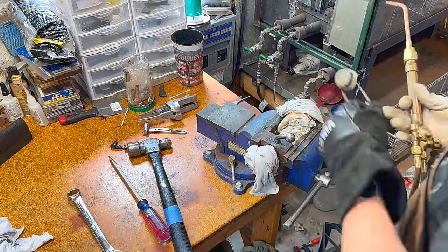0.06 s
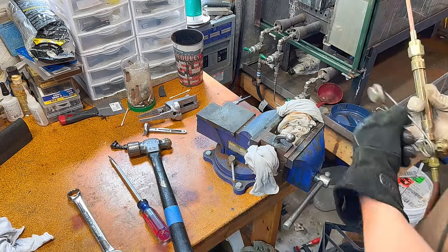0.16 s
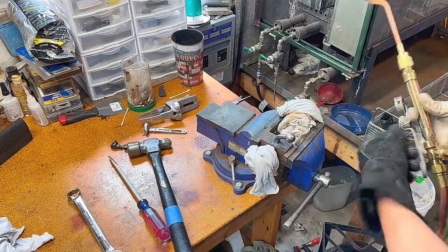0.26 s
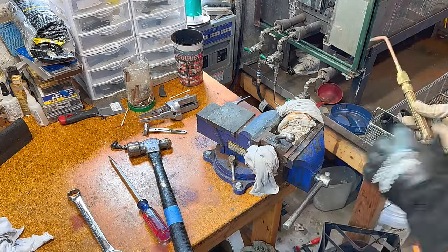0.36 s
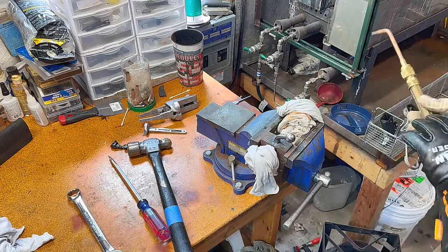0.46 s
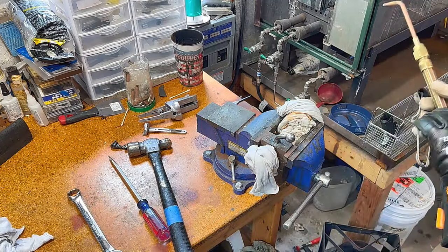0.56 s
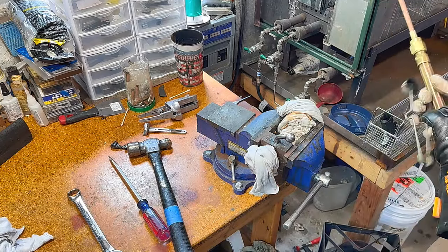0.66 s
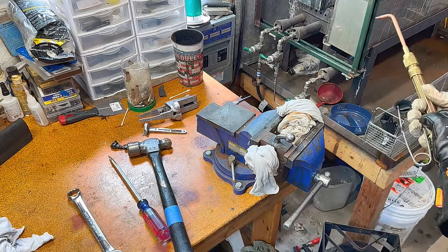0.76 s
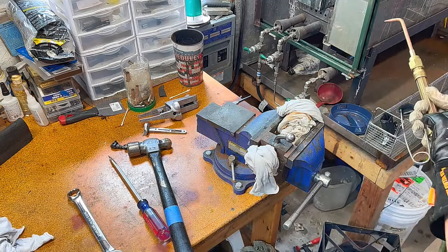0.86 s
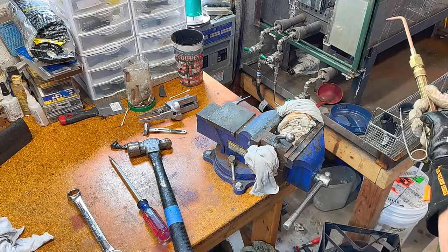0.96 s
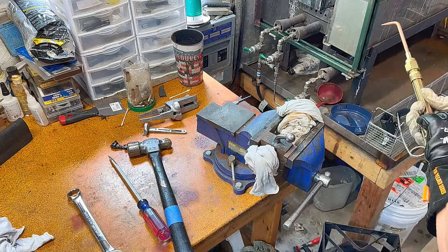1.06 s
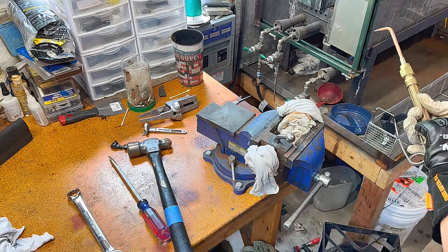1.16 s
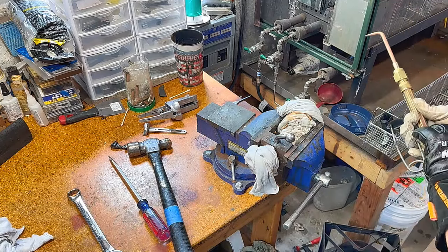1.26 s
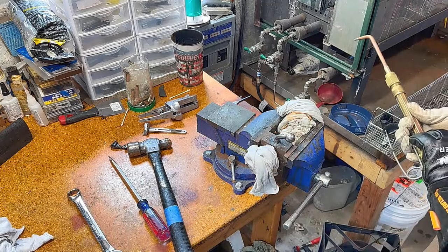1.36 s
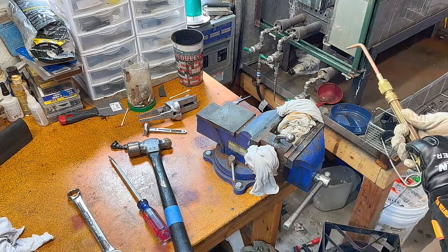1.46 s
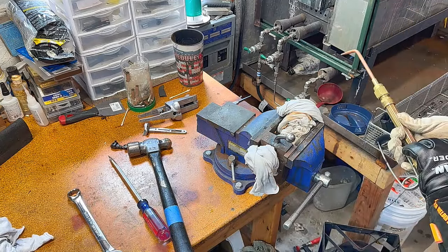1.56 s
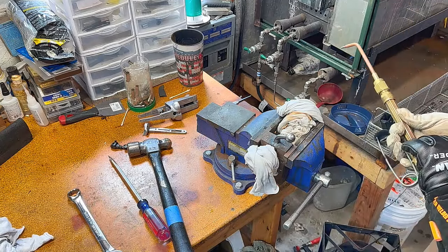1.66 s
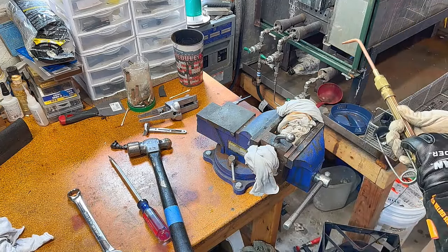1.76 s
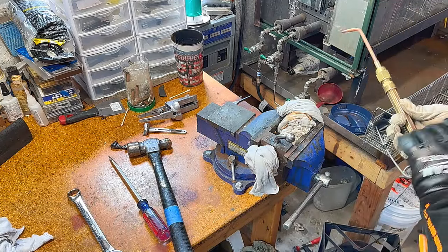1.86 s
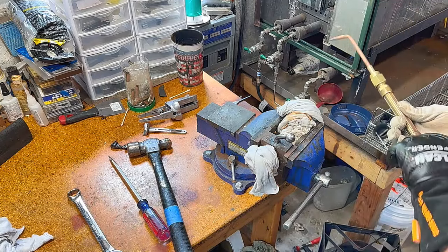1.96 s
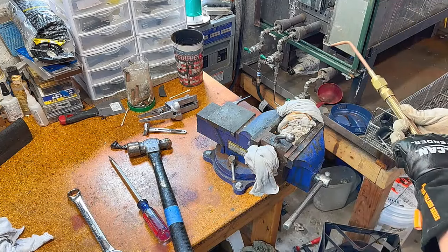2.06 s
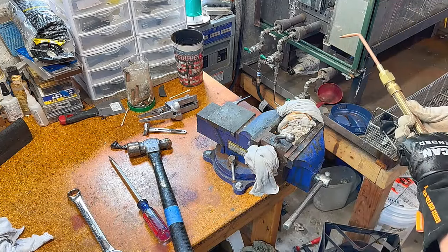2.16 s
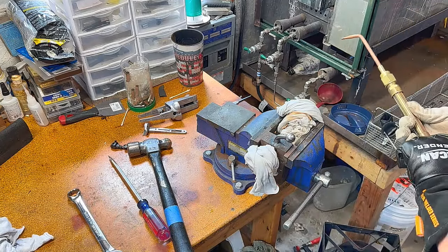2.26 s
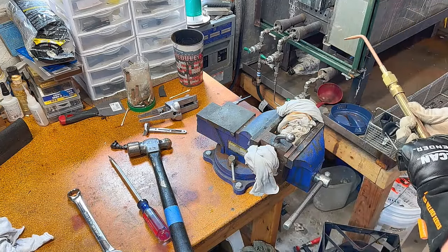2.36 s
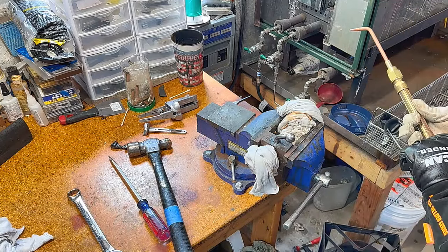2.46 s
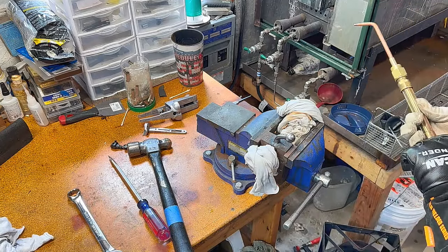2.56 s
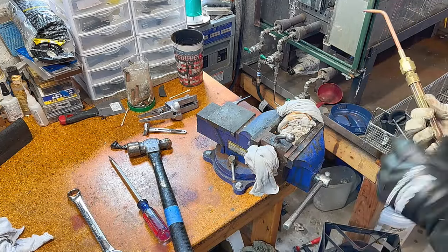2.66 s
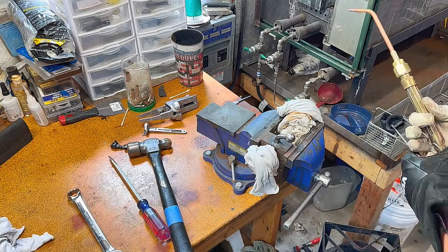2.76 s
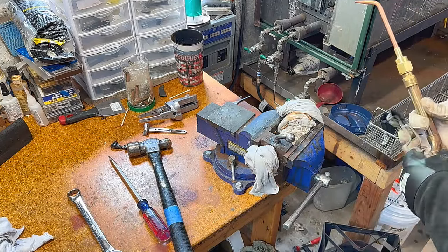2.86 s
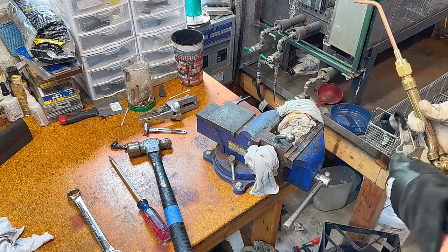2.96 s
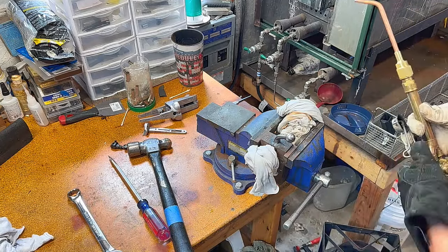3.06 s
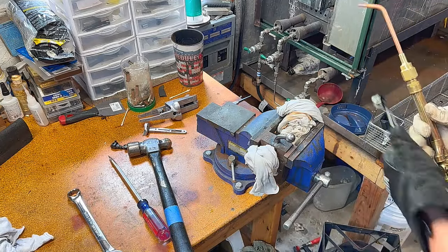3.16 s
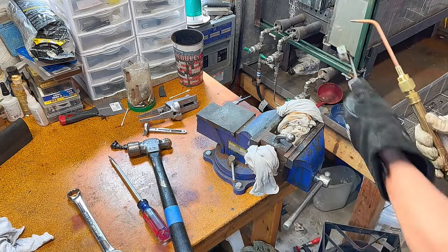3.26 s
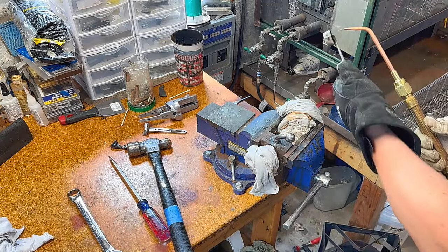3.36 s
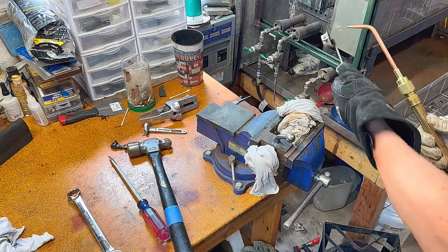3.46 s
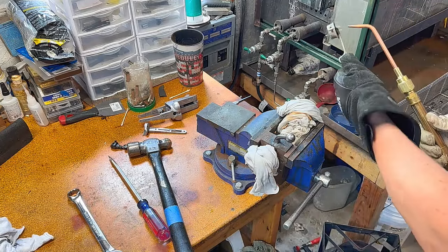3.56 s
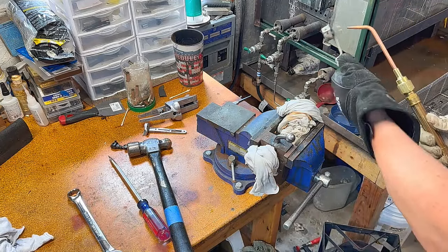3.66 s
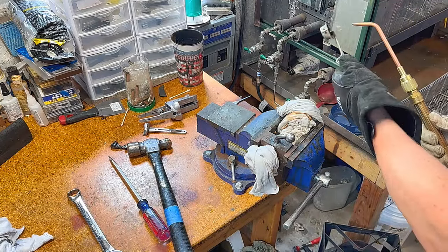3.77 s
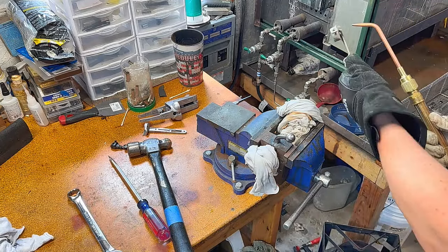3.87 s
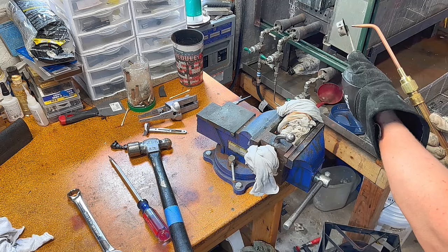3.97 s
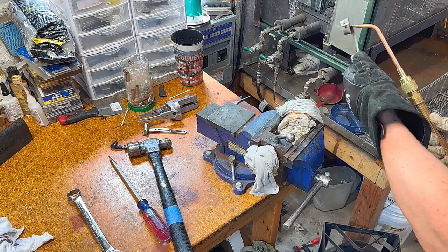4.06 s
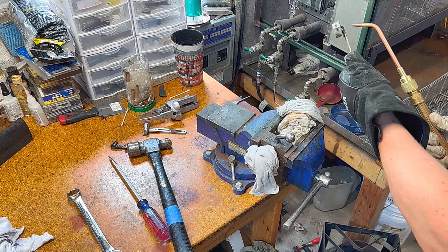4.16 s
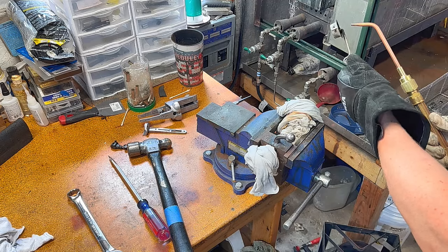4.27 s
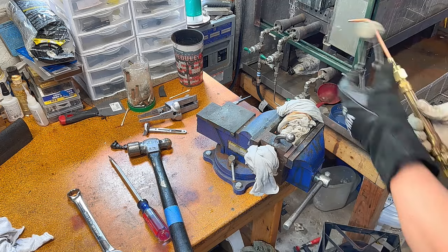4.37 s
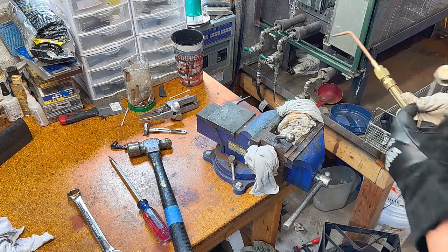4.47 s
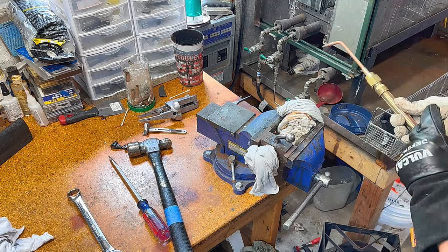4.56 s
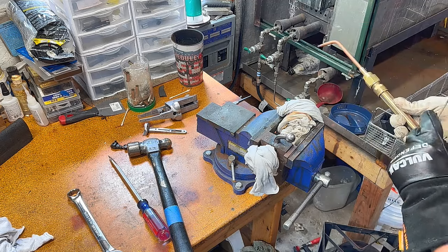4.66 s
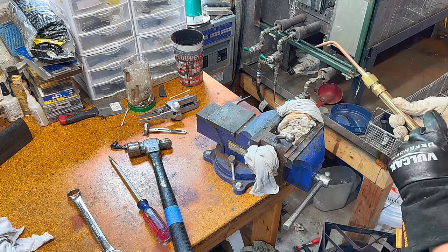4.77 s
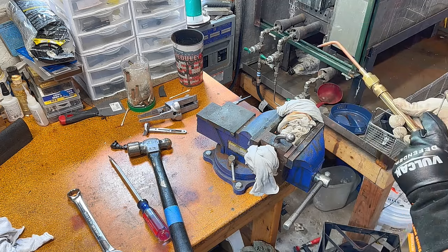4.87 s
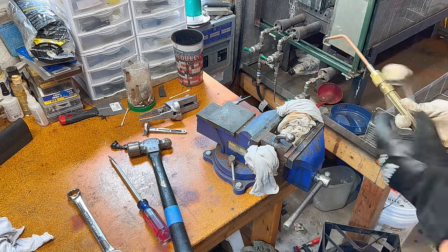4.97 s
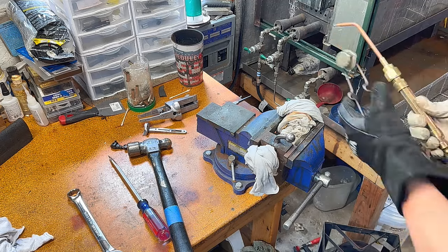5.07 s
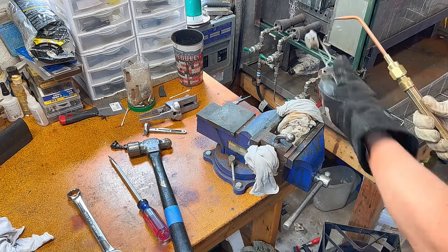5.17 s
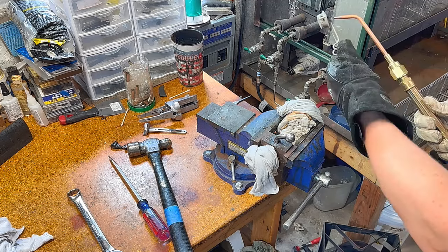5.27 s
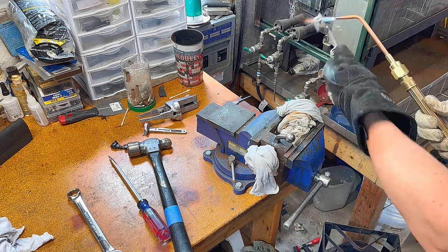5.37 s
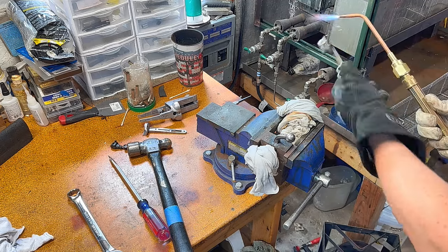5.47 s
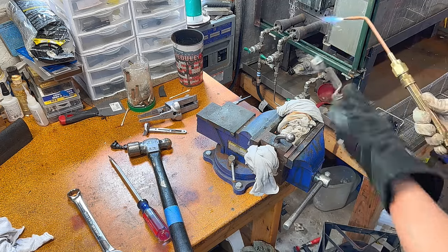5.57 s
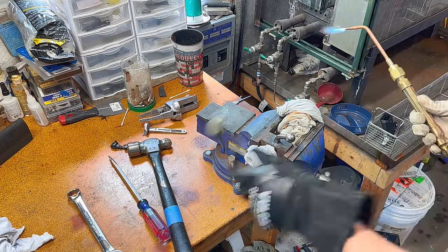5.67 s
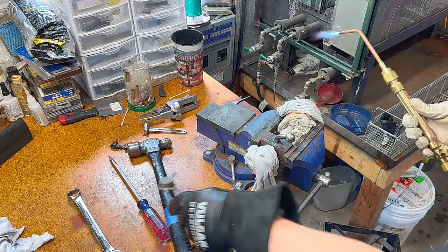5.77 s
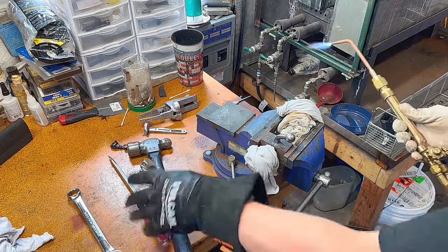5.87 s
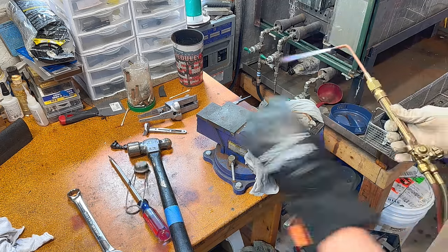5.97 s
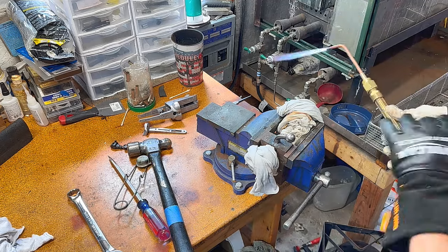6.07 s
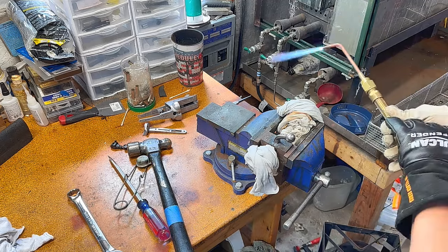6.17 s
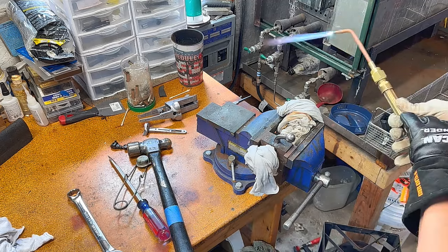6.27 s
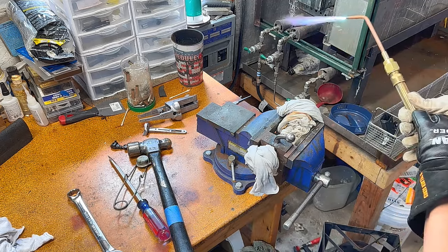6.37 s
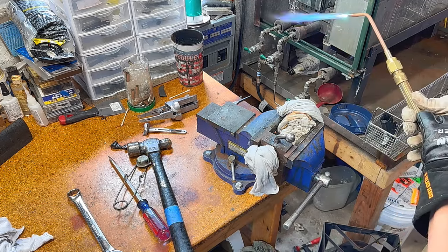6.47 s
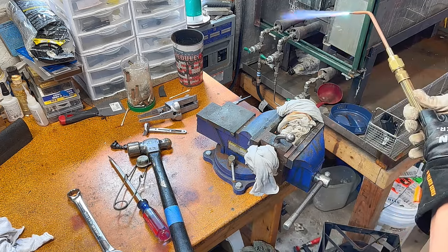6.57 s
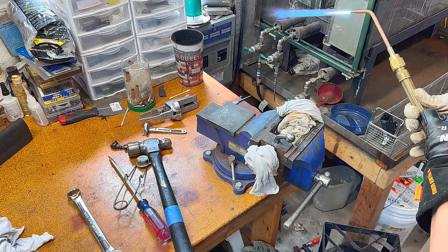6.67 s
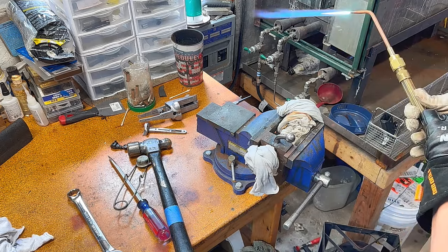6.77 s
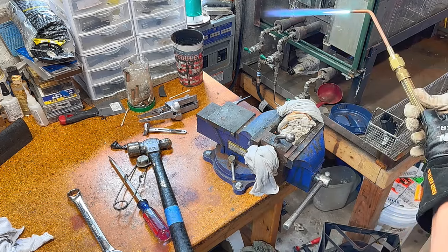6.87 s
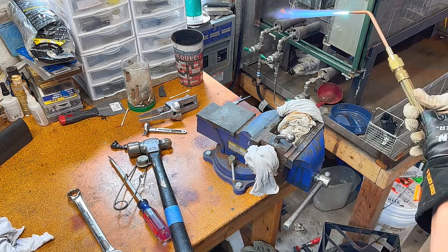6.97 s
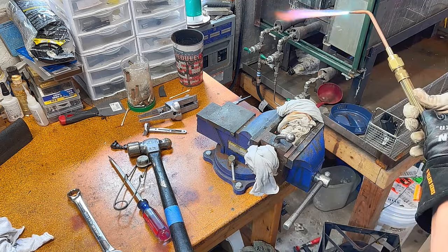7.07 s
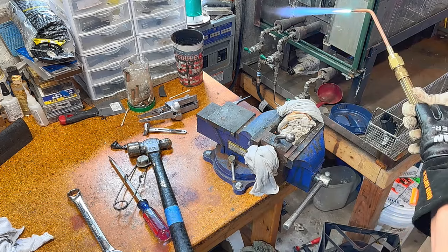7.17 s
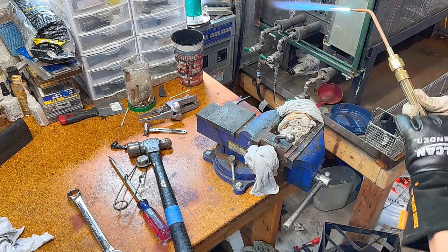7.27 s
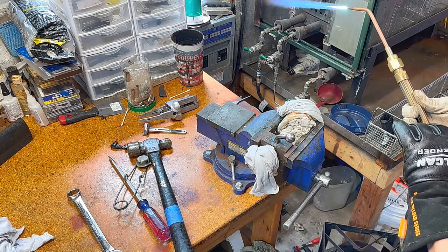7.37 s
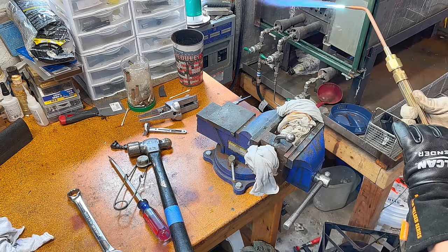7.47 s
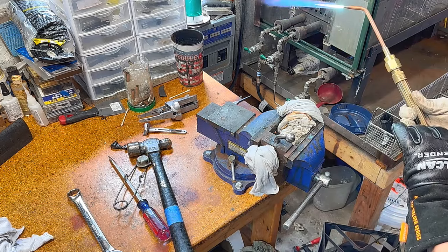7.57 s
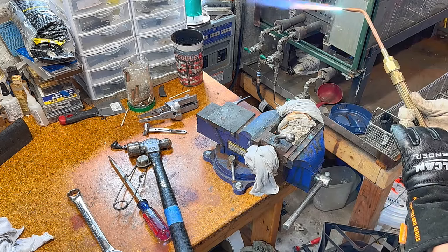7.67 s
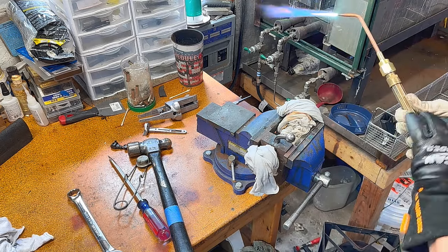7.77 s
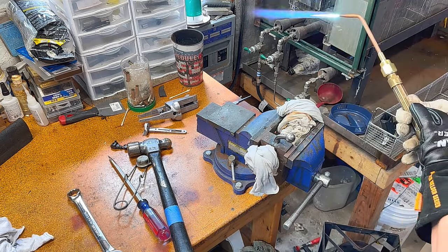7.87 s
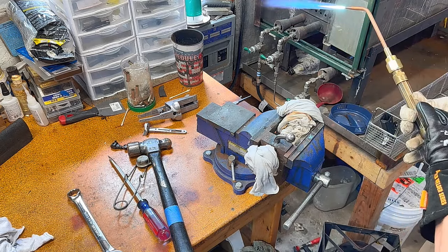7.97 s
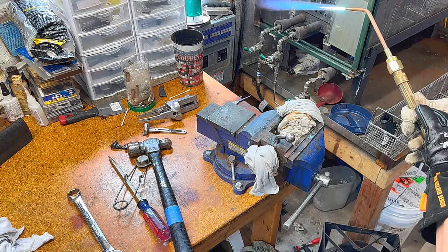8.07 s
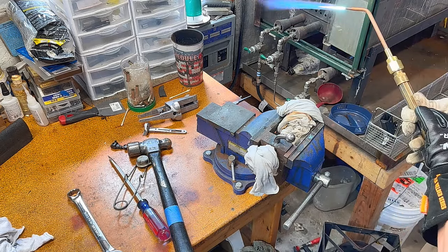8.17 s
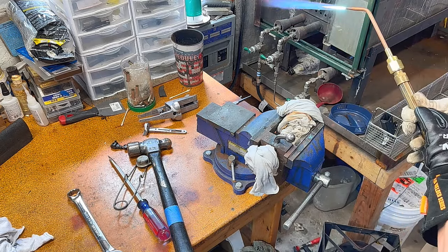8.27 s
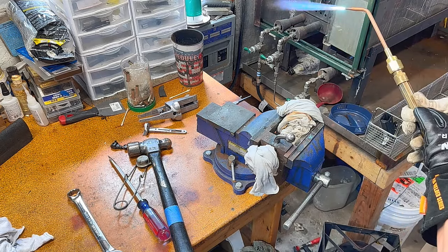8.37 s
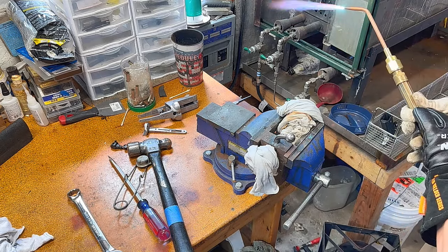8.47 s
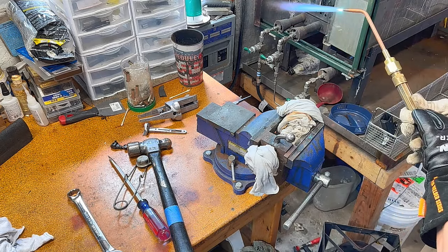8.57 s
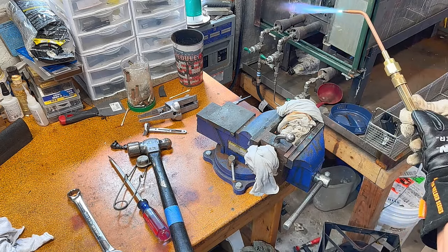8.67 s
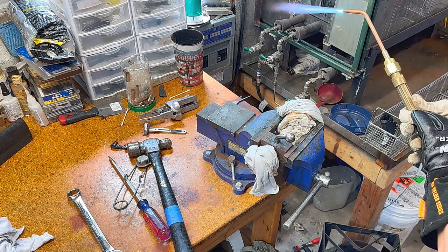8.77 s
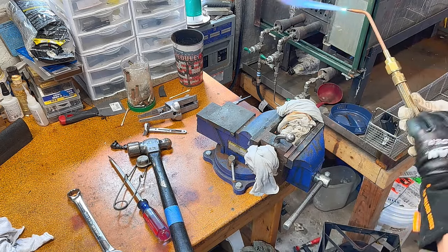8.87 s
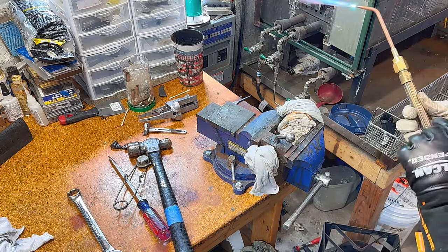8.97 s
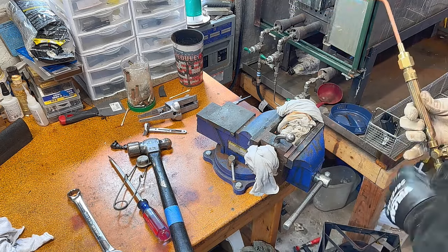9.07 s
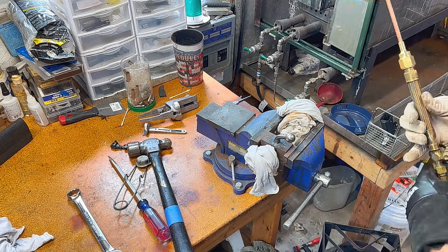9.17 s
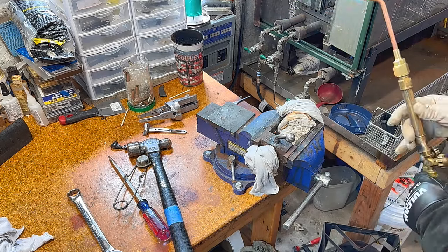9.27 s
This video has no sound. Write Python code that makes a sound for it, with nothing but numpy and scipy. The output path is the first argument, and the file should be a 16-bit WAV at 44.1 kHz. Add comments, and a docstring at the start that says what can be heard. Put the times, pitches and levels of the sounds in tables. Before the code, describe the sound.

A flint striker rasps and rings over a low motor hum, then a gas torch pops alight, hisses hard, and settles into growing flame noise.

```python
"""In a workshop a motor hums while a gas torch is lit over a workbench, heard close by a microphone pair.
Gas leaks from the tip as filtered noise with thin whistles; a flint striker rasps as clicks ringing in metal.
The gas catches with a pop and burns lifted off the tip, as loud hissing noise, then snaps back onto it.
The striker clatters onto the bench; the flame, noise in bands from roar to sizzle, grows as the valves are opened."""
import sys
import numpy as np
from scipy import signal
from scipy.fft import rfft, irfft, next_fast_len
from scipy.io import wavfile
from scipy.ndimage import map_coordinates

SR = 44100
rng = np.random.default_rng(int(sys.argv[2]) if len(sys.argv) > 2 else 0)


def put_to_file(sound):
    """Save the sound as 16-bit audio at rate SR, in the file named by the first command-line argument."""
    columns = np.atleast_2d(sound).T  # one column per channel
    safe = np.clip(columns, -1, 1)
    whole_steps = np.round(safe * 32767)
    wavfile.write(sys.argv[1], SR, whole_steps.astype(np.int16))


N = 411012
TIME = np.arange(N) / SR
SEATED_S = 5.89   # the flame sits on the tip from here on

# Coil spring of the striker. Each row: pitch in Hz, width in Hz, relative level in dB.
SPRING_MODES = [(8330, 170, -5), (8700, 120, 6.5), (8990, 140, 7), (9600, 430, -12.5), (12340, 500, -8),
                (14300, 790, -11)]
# Bands and hollows that the nozzle gives to the hiss of the burning flame.
# Each row: frequency in Hz, relative gain in dB.
NOZZLE_BANDS = [(1450, 1.5), (1750, -5), (2020, 1.5), (2480, -5.5), (2850, 1), (3400, 1), (3880, -3.5),
                (4200, 0), (4580, 1.8), (5350, -4.5), (5750, 0.5), (6150, -1.5), (7170, 1), (7650, -2),
                (8400, 2.5), (9050, -3), (9450, 2.5), (10000, -2.5), (13000, 0.5), (14300, 3), (15500, 0.5)]


def from_db(db):
    """Level in dB to amplitude."""
    return 10 ** (np.asarray(db) / 20)


def rms_one(x):
    """Scale to an rms of 1."""
    return x / np.sqrt(np.mean(x ** 2) + 1e-20)


def in_time(rows):
    """Each column of a curve at every sample."""
    s, *columns = np.transpose(rows)
    return [np.interp(TIME, s, c) for c in columns]


def at_bins(points):
    """A table over log frequency, read at every bin."""
    hz, value = np.transpose(points)
    bins_hz = np.fft.rfftfreq(next_fast_len(N), 1 / SR)
    return np.interp(np.log(bins_hz + 1), np.log(hz), value)


def weigh(x, gains):
    """Give each frequency its gain."""
    spectrum = rfft(x, next_fast_len(N))
    return irfft(spectrum * gains, next_fast_len(N))[..., :N]


def colour(x, points):
    """Shape by a spectrum; white noise keeps its power."""
    return weigh(x, rms_one(from_db(at_bins(points))))


def resonate(x, modes):
    """Parallel resonances; white noise keeps its power."""
    out, power = 0, 0
    for hz, width, db in modes:
        r = np.exp(-np.pi * width / SR)
        zeros = np.array([1, 0, -1]) * (1 - r * r) / 2
        poles = [1, -2 * r * np.cos(2 * np.pi * hz / SR), r * r]
        out = out + from_db(db) * signal.lfilter(zeros, poles, x + 1e-18)
        power += from_db(db) ** 2 * (1 - r)
    return out / np.sqrt(power)


def white():
    """Unrelated noise for the sum and the difference of the two sides."""
    return rng.standard_normal((2, N))


def drift(rate):
    """Slow chance with rms 1, from two random knots per cycle of the rate in Hz."""
    knots = np.arange(0, TIME[-1] + 1, .5 / rate)
    heights = rng.standard_normal(N // 20)[:len(knots)]
    return rms_one(np.interp(TIME, knots, heights))


def grains(per_s, spread_db):
    """Random clicks of uneven size; rms 1."""
    struck = rng.random(N) < per_s / SR
    size = from_db(spread_db * rng.uniform(-2, 2, N))
    return rms_one(struck * np.sign(white()) * size)


def swells(rows, rise_s, fall_s):
    """One envelope per level column: each event swells, holds for its length and dies."""
    out = np.zeros((len(rows[0]) - 2, N))
    for s, length, *levels in rows:
        near = slice(int((s - .1) * SR), int((s + .3) * SR))   # empty for an event before 0.1 s
        t = TIME[near] - s
        shape = np.exp(np.minimum(t, 0) / rise_s - np.maximum(t - length, 0) / fall_s)
        out[:, near] += from_db(levels)[:, None] * shape
    return out


def workshop(x, wet_db, near_t60, far_t60, far_db):
    """Dense echoes from the cluttered bench, then a faint tail; long waves pass the clutter by."""
    t = TIME[:SR // 5]
    turn = 2 * np.pi * 1.8 * TIME   # the echo pattern turns 1.8 times a second, as the hands move
    fading = from_db(-60 * t / near_t60) + from_db(far_db - 60 * t / far_t60)
    clutter = signal.butter(2, 1100, "high", fs=SR, output="sos")
    wet = 0
    for share in (np.cos(turn), np.sin(turn)):
        echoes = signal.sosfilt(clutter, rng.standard_normal((2, len(t))) * fading)
        echoes /= np.linalg.norm(echoes, axis=1, keepdims=True)
        wet = wet + signal.oaconvolve(x * share, echoes, axes=1)[:, :N]
    return (x + from_db(wet_db) * wet) / np.hypot(1, from_db(wet_db))


def motor():
    """A deep, almost pure hum that beats slowly and wanders a little in level."""
    hum_hz, hum_db, wander_db = 58.35, -36.5, 1.5
    beat_hz, beat_crest_s, beat_db = 2.48, .037, 1   # beat_db swings to either side
    # The hum sinks for a while: middle in seconds, half length in seconds, depth in dB.
    hum_sink = (6.33, 0.62, 3.3)
    middle_s, half_s, depth_db = hum_sink
    beat = np.cos(2 * np.pi * beat_hz * (TIME - beat_crest_s))
    sink_db = depth_db * np.exp(-((TIME - middle_s) / half_s) ** 2)
    level_db = hum_db + beat_db * beat - sink_db + wander_db * drift(rate=2.0)
    return from_db(level_db) * np.sqrt(2) * np.sin(2 * np.pi * hum_hz * TIME)


def workshop_air():
    """Broad noise of the room air, and noise in narrow resonances that drones at a few pitches."""
    # Room air. Each row: frequency in Hz, relative density in dB per Hz.
    air_colour = [(25, -5.5), (50, -2), (90, 4), (140, -12), (200, -15), (300, -10), (480, -16.5),
                  (700, -19.5), (1400, -26.5), (2500, -36.5), (5000, -52), (16000, -47.5)]
    # Drone of the workshop. Each row: pitch in Hz, width in Hz, relative level in dB.
    drone_modes = [(234.5, 15, 0), (414.7, 15.7, -9.5), (775, 16, -18), (1044, 20, -17.5),
                   (1442, 33, -19.5), (1583, 26, -25.5), (1970, 81, -30)]
    air = from_db(-56.5) * colour(white(), air_colour)
    drone = from_db(-59.5) * resonate(white(), drone_modes)
    return air + drone


def unlit_gas():
    """Escaping gas hisses faintly in the bore of the tip, with wavering whistles and one low whoop."""
    # Hiss before and after the striking. Each row: time in seconds, relative level in dB.
    leak_curve = [
        [(0.0, -66), (1.13, -78.5), (2.54, -71), (2.68, -68), (3.3, -69.5)],
        [(4.4, -69.5), (4.808, -75), (4.91, -68.5), (5.05, -68.5), (5.27, -66)],
    ]
    # Each row: frequency in Hz, relative density in dB per Hz.
    leak_colour = [(500, 10), (2500, 1), (4200, -4.5), (5500, -2.5), (7000, -2.5), (8300, -3), (10500, -16),
                   (13000, -16), (15000, -6), (16000, -12.5)]
    # The bore sings faintly. Each row: pitch in Hz, width in Hz, relative level in dB.
    bore_modes = [(4180, 170, -1.5), (7030, 356, -1), (8230, 200, 1.5)]
    # Gas and valves whistle thinly. Each row: start and end in seconds, starting pitch in Hz,
    # glide in octaves per second, level in dB, flicker in dB.
    whistles = [(1.42, 1.95, 531, 0, -69, 3), (1.9, 4.75, 533, 0, -65.5, 3),
                (2.47, 2.69, 925, .2, -62.5, .5), (2.63, 2.74, 950, .6, -71, 1),
                (.17, .36, 640, 1.6, -68, 2), (1.42, 2.2, 4230, 0, -84, 3), (3.2, 5.25, 4230, 0, -84, 3),
                (4.96, 5.19, 4030, 0, -73, 1), (5.0, 5.25, 4430, 0, -80, 2)]
    # Each row: middle and width in seconds, pitch at the middle in Hz, glide in octaves per second, level in dB.
    whoops = [(4.765, .016, 172, -14, -31)]
    leak_db, = in_time(np.vstack(leak_curve))
    hiss = colour(white(), leak_colour) + from_db(-9) * resonate(white(), bore_modes)
    out = from_db(leak_db + 3) * hiss * (TIME < SEATED_S)
    waver, flicker = drift(rate=15), drift(rate=4.5)
    for start, end, hz, glide, db, flicker_db in whistles:
        pitch = hz * 2 ** (glide * np.clip(TIME - start, 0, end - start))
        gate = np.clip(np.minimum(TIME - start, end - TIME) / 0.014, 0, 1)
        phase = 2 * np.pi * np.cumsum(pitch * (1 + 0.00288 * waver)) / SR
        out[0] += from_db(db + flicker_db * flicker) * gate * np.sin(phase)
    for s, width, hz, glide, db in whoops:
        pitch = hz * 2 ** np.clip(glide * (TIME - s), -1, 1)
        swell = np.exp(-((TIME - s) / width) ** 2)
        out[0] += from_db(db) * swell * np.sin(2 * np.pi * np.cumsum(pitch) / SR)
    return out


def arm_squeal(drive):
    """The wire arm rings on one wavering note while driven, then dies away."""
    arm_hz, waver, t60_s = 7120, 0.0064, 0.054
    keep = from_db(-60 / (t60_s * SR)) ** 2
    level = np.sqrt(signal.lfilter([1 - keep], [1, -keep], drive ** 2 + 1e-18))
    phase = 2 * np.pi * np.cumsum(arm_hz * (1 + waver * drift(rate=120))) / SR
    return np.sqrt(2) * level * np.array([np.sin(phase), np.cos(phase)])


def handling():
    """Gloves rub, and the striker's wire ticks against the brass torch: brass, spring and arm ring."""
    # Wire and brass touch in the hands. Each row: start and length in seconds,
    # then relative levels in dB of tap, brass ring, spring ring, arm ring.
    ticks = [(0.661, 0.0078, -65, -35, -53, -49), (0.766, 0.0055, -59, -74, -74, -63),
             (1.035, 0.0075, -52.5, -53.5, -64, -56), (1.097, .001, -55, -73, -81, -85),
             (1.802, 0.008, -51, -76, -61, -70), (2.570, 0.0055, -55, -59, -60, -53),
             (2.853, 0.0085, -55, -45.5, -40.5, -51), (5.232, .01, -65, -68, -81, -64)]
    # Leather gloves shift their grip. Each row: start and length in seconds,
    # then relative levels in dB of rub, spring ring.
    rustles = [(.08, .03, -58.5, -80), (.18, 0.096, -62, -72), (.58, 0.01, -62, -83),
               (.618, 0.01, -59.5, -88), (1.41, 0.03, -67, -88), (1.8, 0.15, -67, -84),
               (1.878, .004, -67, -79), (2.62, 0.27, -64, -75), (2.66, 0.013, -62, -82),
               (4.89, 0.068, -61.5, -77), (5.185, 0.012, -58, -84)]
    # Each row: frequency in Hz, relative density in dB per Hz.
    leather = [(200, -1.5), (600, 1.5), (1100, 1.5), (1500, -5), (2500, -7.5), (3500, -14.5), (5000, -8.5),
               (9000, -22), (16000, -42)]
    # Brass of the torch. Each row: pitch in Hz, width in Hz, relative level in dB.
    brass_modes = [(2100, 120, -1), (3600, 130, -1), (4640, 300, 3.5), (5400, 640, -3), (6860, 900, -1),
                   (8300, 770, -11), (12800, 760, -4), (14200, 700, 0), (15500, 600, -3)]
    tap, brass, wire, arm = swells(ticks, rise_s=0.0042, fall_s=0.0018)
    rub, slide = swells(rustles, rise_s=0.013, fall_s=0.011)
    friction = grains(per_s=11000, spread_db=4.5)
    rubbing = colour(friction * (tap + rub), leather)
    brass_ring = resonate(friction * brass, brass_modes)
    spring_ring = resonate(friction * (wire + slide), SPRING_MODES)
    return rubbing + brass_ring + spring_ring + arm_squeal(arm)


def striker():
    """Flint chips at the file's teeth with each squeeze and snaps back; cup, arm and spring ring."""
    # The flint is dragged over the file and flung back. Each row: start and length in seconds,
    # then relative levels in dB of rasp, cup hollow, arm, spring.
    strokes = [(3.392, 0.013, -32.5, -60.5, -42, -41), (3.490, 0.0054, -32, -44.5, -26.5, -26),
               (3.559, 0.0046, -33, -53, -31.5, -41), (3.640, 0.0055, -39.5, -49.5, -34.5, -26.5),
               (3.705, 0.021, -32, -59.5, -38.5, -40), (3.757, 0.0039, -44, -69, -59, -58),
               (3.805, 0.0063, -28.5, -40.5, -25.5, -26.5), (3.983, .031, -33, -52, -42, -41.5),
               (4.02, 0.029, -51, -71, -58, -51), (4.067, 0.013, -32.5, -49, -39, -32.5),
               (4.172, 0.026, -37, -48.5, -40.5, -44), (4.218, 0.007, -47, -58, -38, -44),
               (4.235, 0.034, -49, -66, -54, -62), (4.267, .009, -33, -42, -42, -30)]
    # The arm snaps against its stop. Each row: start and length in seconds, relative level in dB.
    stops = [(3.4925, 0.00045, -23.5), (3.648, .0003, -27), (3.8122, 0.0006, -25.5), (4.0735, .0003, -34),
             (4.2725, 0.00037, -25.5)]
    # Each row: frequency in Hz, relative density in dB per Hz.
    rasp_colour = [(200, -9), (500, -7), (800, -6), (1400, -2.5), (2200, -9.5), (2800, -2), (3300, 2),
                   (4100, 3.5), (5000, -4.5), (6200, -8), (7600, -0.5), (9300, -6.5), (11000, 2.5),
                   (14000, -12), (16000, -3)]
    # Steel wall of the cup. Each row: pitch in Hz, width in Hz, relative level in dB.
    cup_modes = [(3150, 120, 2.5), (3460, 110, 1), (3810, 130, -3.5), (3970, 130, -6), (4560, 180, -8)]
    # Hollow of the cup. Each row: pitch in Hz, width in Hz, relative level in dB.
    hollow_modes = [(590, 70, -11), (790, 59, 2), (892, 38, 3.5), (1300, 180, -11)]
    rasp, hollow, arm, spring = swells(strokes, rise_s=0.0042, fall_s=0.0033)
    stop, = swells(stops, rise_s=.0003, fall_s=0.00046)
    teeth = grains(per_s=3600, spread_db=2.5) * from_db(0.74 * drift(rate=120))
    snap = stop * white()
    scraping = teeth * rasp
    cup = 0
    for hz, width, db in cup_modes:   # the flint's place favours now one mode, now another
        favour = from_db(db + 4.7 * drift(rate=7))
        cup = cup + resonate(scraping * favour, [(hz, width, 0)])
    scrape = from_db(-2.5) * colour(scraping + snap, rasp_colour) + from_db(-18.0) * cup
    hollow_ring = resonate(teeth * hollow, hollow_modes)
    spring_ring = resonate(teeth * spring + snap, SPRING_MODES)
    return scrape + hollow_ring + spring_ring + arm_squeal(arm)


def pops():
    """A pocket of gas burns at once, with a boom and a crack; gusts of air at the microphone give softer, deeper puffs."""
    # The flame catches, and later seats itself on the tip.
    # Each row: start and length in seconds, relative levels in dB of boom, crack.
    pockets = [(5.316, 0.0075, -21, -19.5), (5.865, 0.011, -23, -34), (5.884, 0.005, -22, -14)]
    # Each row: pitch in Hz, width in Hz, relative level in dB.
    boom_modes = [(270, 70, 0), (442, 110, -1)]
    # Each row: frequency in Hz, relative density in dB per Hz.
    crack_colour = [(50, 9.5), (150, -10), (300, 0), (600, 1.5), (850, 4), (1500, -1), (2800, -9),
                    (4200, -24), (16000, -38.5)]
    # Gusts of air at the microphone. Each row: start and length in seconds, relative level in dB.
    puffs = [(5.51, 0.029, -34.5), (8.61, .015, -41), (9.13, .015, -42)]
    # Each row: frequency in Hz, relative density in dB per Hz.
    puff_colour = [(30, -12), (80, 0), (170, -8), (400, -19), (2000, -70)]
    boom, crack = swells(pockets, rise_s=0.0049, fall_s=0.0077)
    puff, = swells(puffs, rise_s=0.0096, fall_s=0.014)
    bangs = resonate(boom * white(), boom_modes) + colour(crack * white(), crack_colour)
    return bangs + colour(puff * white(), puff_colour)


def lifted_flame():
    """The flame stands off the tip and tears in the jet: it swells, sags as it burns and collapses."""
    lit_s, collapse_s, rise_s, fall_s = 5.316, 5.86, 0.0047, 0.0089
    # Each row: frequency in Hz, relative density in dB per Hz.
    lifted_colour = [(50, -10), (130, -12.5), (200, -11), (285, -1), (355, -17), (430, -2), (530, -9),
                     (620, -6.5), (725, -6), (830, -9), (1300, -2), (2500, -2), (3200, -1.8), (4500, -1.5),
                     (5500, -4), (7100, 2), (8400, 4.5), (9500, 2), (14300, 1.5), (16000, 3.5)]
    # The middle of the hiss flares unevenly. Each row: pitch in Hz, width in Hz, relative level in dB.
    flare_modes = [(2060, 500, -1.5), (3570, 700, 0.5), (4900, 700, 0)]
    burning = np.exp(np.minimum(TIME - lit_s, 0) / rise_s - np.maximum(TIME - collapse_s, 0) / fall_s)
    lifted_db = -12.5 - 4.5 * np.maximum(TIME - lit_s, 0)   # sags by 4.5 dB per second
    tearing = from_db(lifted_db + 0.11 * drift(rate=230)) * burning * white()
    flaring = from_db(lifted_db - 15 + 2.9 * drift(rate=14)) * burning * white()
    return colour(colour(tearing, lifted_colour) + resonate(flaring, flare_modes), NOZZLE_BANDS)


def bench_echo(x):
    """The bench throws the flame's sound back; the delay shifts as the hand sways."""
    lag_s = .00488 + .00005 * drift(rate=.7)
    echo = np.array([map_coordinates(side, [(TIME - lag_s) * SR], order=3) for side in x])
    echo_gain = from_db(-13.5)
    return (x + echo_gain * echo) / np.hypot(1, echo_gain)


def dropped_striker():
    """Each bounce thuds in the bench, knocks on its top and makes the wire clink and tick."""
    contact_s = 0.0041   # length of every bounce
    # The striker lands on the bench. Each row: start in seconds,
    # then relative levels in dB of thud, knock, wire ring, steel tick.
    bounces = [(5.8825, -16.5, -20.5, -26.5, -32), (5.9356, -33, -20.5, -46, -48),
               (5.9465, -29, -35, -31, -36), (5.957, -29, -47, -52, -56), (5.9874, -42, -29, -44, -28),
               (6.001, -31, -31.5, -32, -36), (6.012, -40, -39, -46, -43), (6.026, -36, -35, -43, -47)]
    # Body of the bench. Each row: pitch in Hz, width in Hz, relative level in dB.
    bench_modes = [(275, 67, 2), (443, 55, 1), (610, 54, -1.5), (877, 47, 3)]
    # Wooden top. Each row: frequency in Hz, relative density in dB per Hz.
    top_colour = [(100, -17), (400, 5.5), (900, 3), (1500, 3), (2900, -6), (4400, -17), (9000, -16),
                  (16000, -29)]
    # Loose wire frame. Each row: pitch in Hz, width in Hz, relative level in dB.
    wire_modes = [(3540, 75, -7), (3932, 90, -1), (5170, 300, -10), (6450, 200, -5), (6880, 110, 7.5),
                  (8800, 170, -7)]
    # Steel touches steel. Each row: frequency in Hz, relative density in dB per Hz.
    steel_colour = [(1000, -20), (3500, -11), (6000, -5), (9000, -4), (12500, 7), (14200, 11), (16000, -4),
                    (20000, -20)]
    held = [(s, contact_s, *levels) for s, *levels in bounces]
    _, knock, ring, tick = swells(held, rise_s=0.0039, fall_s=0.0048)
    blows = np.zeros((2, N))
    for s, thud_db, *_ in bounces:
        blows[0, int(s * SR)] = from_db(thud_db) * np.sqrt(2 * contact_s * SR)
    rattle = grains(per_s=1700, spread_db=-1)
    wood = resonate(blows, bench_modes) + colour(white() * knock, top_colour)
    return wood + resonate(rattle * ring, wire_modes) + colour(rattle * tick, steel_colour)


def seated_flame():
    """Large eddies roar with the fuel; rush, jet hiss and sizzle grow with oxygen, the finest eddies fastest."""
    # The two valves. Each row: time in seconds, fuel level in dB, oxygen level in dB.
    valves = [(6.08, -39, -49.5), (6.63, -38.5, -49), (6.72, -49, -60), (6.76, -43, -51.5),
              (6.9, -39.5, -52.5), (6.99, -35.5, -46), (7.07, -37, -48.5), (8.2, -35, -43),
              (8.32, -32.5, -40), (8.5, -31, -38), (8.64, -30.5, -36), (8.78, -32.5, -36.5),
              (8.9, -31.5, -36.5), (9.1, -31.5, -36.5), (9.3, -30.5, -35)]
    # Roar as bench and walls colour it. Each row: pitch in Hz, width in Hz, relative level in dB.
    roar_modes = [(210, 29, -10), (285, 46, 4.5), (429.6, 41, 0), (498, 49, -2.5), (626, 38, -0.5),
                  (720.6, 26, 2.5), (858, 21, -1.5)]
    # Smaller eddies. Each row: frequency in Hz, relative density in dB per Hz.
    rush_colour = [(40, 1), (80, 13.5), (130, -28), (350, 5), (750, 3), (940, -11), (1100, 1), (1400, -2),
                   (1700, -6), (2200, -7), (2800, -25), (6000, -40)]
    # Each row: pitch in Hz, width in Hz, relative level in dB.
    rush_modes = [(1022, 46, 1), (1145, 60, 0.5), (1298, 67, 2.5), (1434, 40, -1.5), (1924, 54, -8.5),
                  (2060, 40, -9), (2280, 40, -3.5)]
    # Each row: frequency in Hz, relative density in dB per Hz.
    jet_colour = [(800, -20), (1800, -4), (2600, -6), (3400, 1), (4500, 0), (5400, -2), (7000, 0),
                  (8400, 1), (9500, -1), (12500, -5), (14300, -13), (16000, -13)]
    # The finest eddies, which need a fast jet. Each row: frequency in Hz, relative density in dB per Hz.
    sizzle_colour = [(2000, -54), (6000, -2.5), (9500, 6.5), (14300, -0.5), (16000, 1)]
    # The torch is swung upright and a fuller rush comes in: start and end in seconds, level in dB.
    upright = (8.95, 9.2, -40)
    # Each row: pitch in Hz, width in Hz, relative level in dB.
    swing_modes = [(414, 61, 4), (720, 51, -3), (865, 53, 5), (980, 55, 6), (1150, 150, -4),
                   (2500, 340, -23)]
    fuel_db, oxygen_db = in_time(valves)
    fuel_flow_db, flow_db = fuel_db + 32, oxygen_db + 37   # 0 dB with both valves open
    seated = np.clip((TIME - SEATED_S) / 0.014, 0, 1)
    flutter = drift(rate=26)

    rumble = colour(white(), [(60, -6.5), (200, 3.5), (800, -4.5), (2000, -34)])
    roar = from_db(-46 + fuel_flow_db + 0.54 * flutter) * resonate(rumble, roar_modes)
    eddies = from_db(-2.0) * colour(white(), rush_colour) + from_db(-4.0) * resonate(white(), rush_modes)
    rush = from_db(-38 + 1.19 * flow_db + 0.55 * flutter) * eddies
    jet = from_db(-37.5 + 0.97 * flow_db + 1.57 * flutter) * white()
    sizzle = from_db(-39 + 2.7 * flow_db) * colour(white(), sizzle_colour)
    start, end, swing_db = upright
    raised = np.clip((TIME - start) / (end - start), 0, 1)
    swing = from_db(swing_db + flutter) * raised * resonate(white(), swing_modes)
    hiss = colour(colour(jet, jet_colour) + sizzle, NOZZLE_BANDS)
    return seated * (roar + rush + swing + hiss)


def scene():
    """Striker, handling and flame echo in the workshop; gas, air and hum are added dry."""
    # Microphone pair, for the sum of its sides. Each row: frequency in Hz, gain in dB.
    sum_response = [(9700, 0), (10400, -5), (10900, -42), (11750, -42), (12200, -6), (13300, 0)]
    # The same for the difference of its sides. Each row: frequency in Hz, gain in dB.
    difference_response = [(100, -18), (300, -14), (900, -9), (1500, -1), (1900, -12), (4400, -15),
                           (5300, -1), (6000, -6), (7400, 2), (8500, -18), (9600, 0), (12800, -3),
                           (13800, -20), (15000, -16), (15600, -3)]
    lighting = handling() + striker() + pops() + bench_echo(lifted_flame()) + dropped_striker()
    lighting = workshop(lighting, wet_db=-3.5, near_t60=0.072, far_t60=0.17, far_db=-24)
    flame = workshop(bench_echo(seated_flame()), wet_db=-3.5, near_t60=0.067, far_t60=0.12, far_db=-26.5)
    mid, side = lighting + flame + unlit_gas()
    air = workshop_air()
    mid = weigh(mid, from_db(at_bins(sum_response))) + air[0]
    side = weigh(side + air[1], from_db(at_bins(difference_response)))
    return mid + side * np.array([[1], [-1]]) + motor() * from_db([[-.5], [.5]])


def record(dry):
    """The top is cut steeply above 15.7 kHz."""
    return signal.sosfiltfilt(signal.ellip(10, .05, 60, 15700, fs=SR, output="sos"), dry)


dry = scene()
out = record(dry)
put_to_file(out)
```